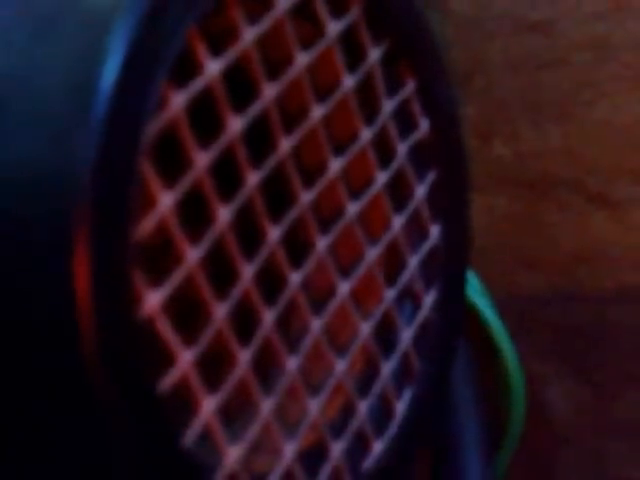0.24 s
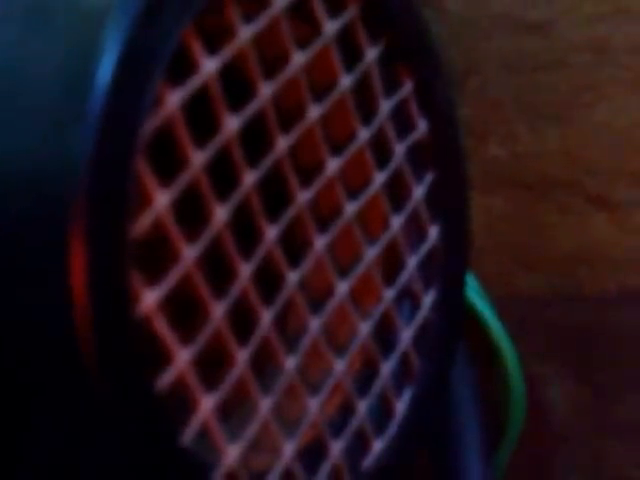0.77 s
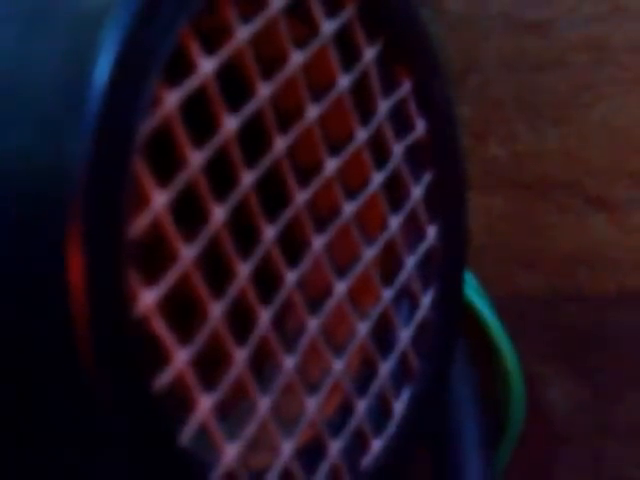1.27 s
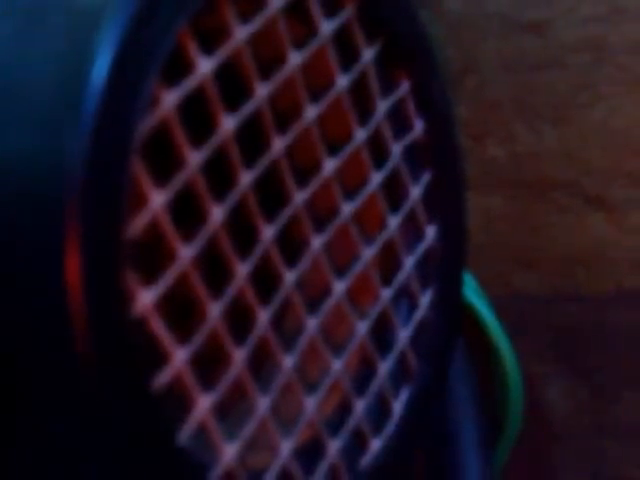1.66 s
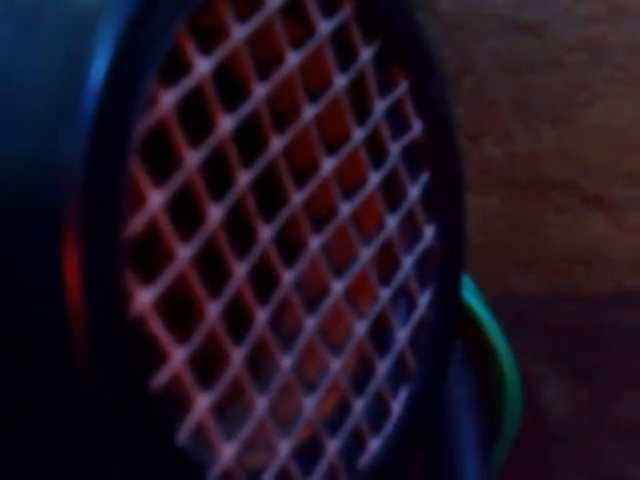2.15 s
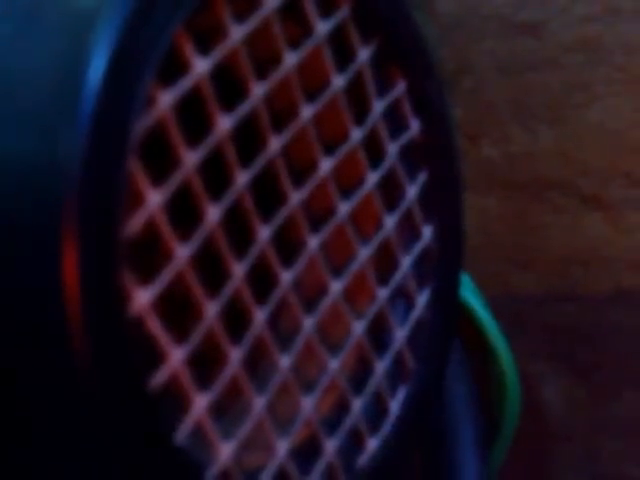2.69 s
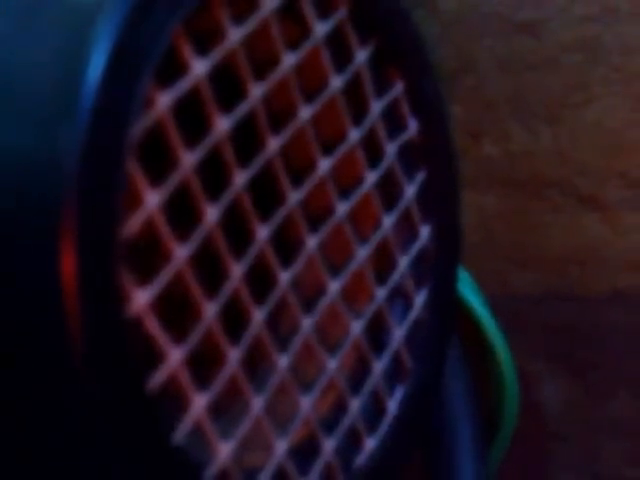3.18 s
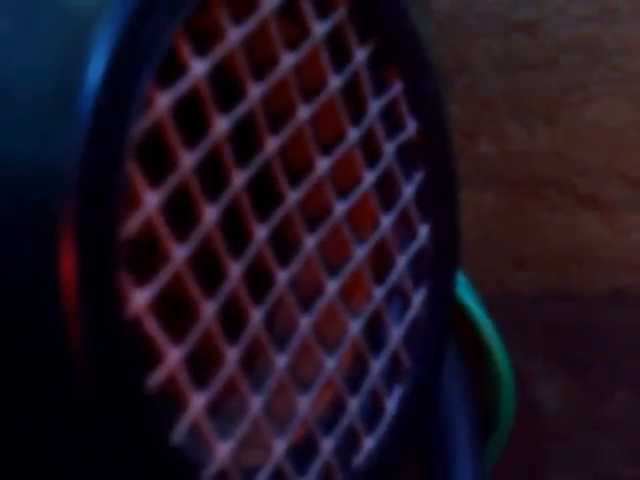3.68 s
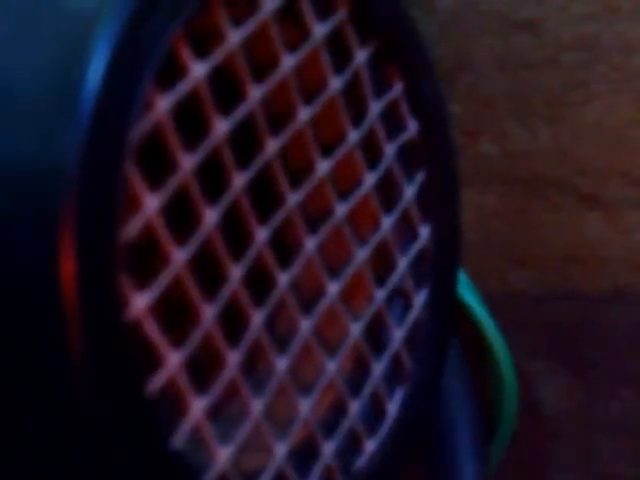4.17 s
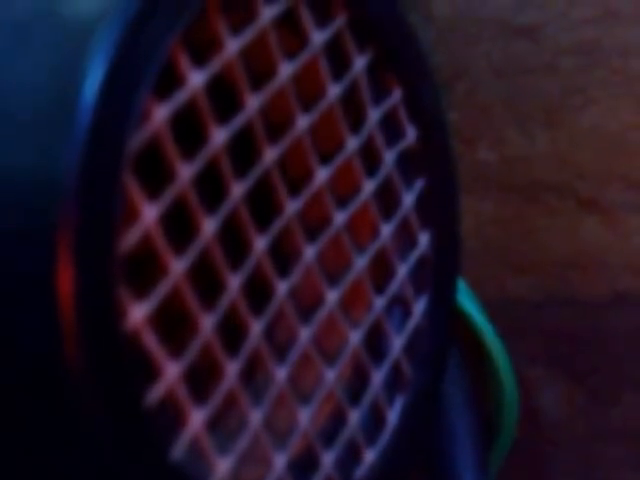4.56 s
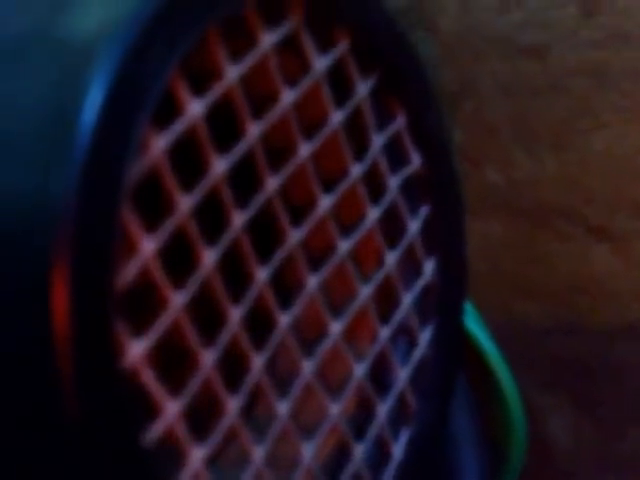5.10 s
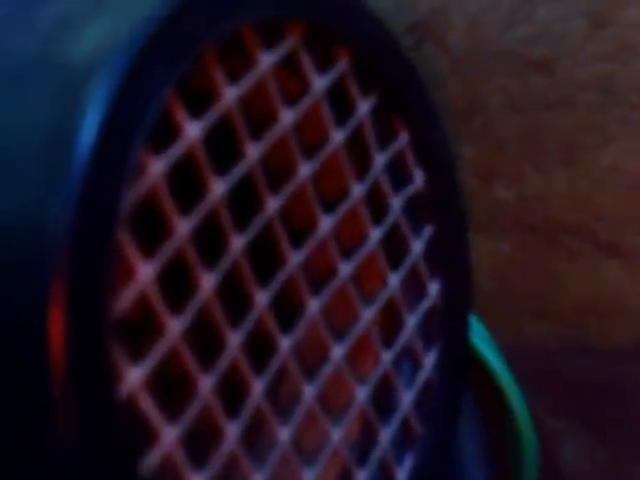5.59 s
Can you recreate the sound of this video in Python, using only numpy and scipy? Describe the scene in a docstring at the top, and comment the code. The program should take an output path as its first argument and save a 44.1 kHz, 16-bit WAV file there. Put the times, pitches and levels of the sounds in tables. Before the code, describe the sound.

A small heater blower runs steadily close by, its airy hiss carrying a scratchy chirping loop about ten times a second.

```python
"""A small diesel heater idles close by; its blower makes about ten turns a second.
Motor brushes scrape over the same worn patches and nicks on every turn and ring the housing, as filtered
looping noise with gliding squeaks, so the hiss chirps in a loop; now and then the rotor sags.
Air, as shaped noise, rushes through the outlet grille; the motor hum and drive whine are sine tones.
Two low sine drones and a few soft decaying bumps lie underneath."""
import sys
import numpy as np
from scipy import signal
from scipy.fft import rfft, irfft
from scipy.io import wavfile
from scipy.ndimage import uniform_filter1d

SR = 44100
rng = np.random.default_rng(int(sys.argv[2]) if len(sys.argv) > 2 else 0)


def wrap_up_sound(samples):
    """Save the sound to the file named by the first command line argument, as 16-bit audio."""
    columns = np.atleast_2d(samples).T
    # keep every value between -1 and 1, then stretch to whole-number steps
    tamed = np.clip(columns, -1, 1)
    steps = np.round(tamed * 32767).astype(np.int16)
    wavfile.write(sys.argv[1], SR, steps)


N = 257544

FREE_TURNS_PER_S, SAG_TURNS_PER_S = 10.1836, 0.41   # free speed; drop in a full sag


def from_db(db):
    """Decibels to gain."""
    return 10 ** (np.asarray(db) / 20)


def rms_one(x):
    """Scale to unit rms."""
    return x / np.sqrt(np.mean(x ** 2) + 1e-20)


def evened(x, window_s=0.393):
    """Hold the rms at 1 over a few turns."""
    power = np.abs(uniform_filter1d(x ** 2, int(window_s * SR)))
    return x / np.sqrt(power + 1e-12)


def in_time(rows):
    """One value per sample for each column of a curve."""
    s, *columns = np.transpose(rows)
    return [np.interp(np.arange(N) / SR, s, c) for c in columns]


def bell(away, half_length):
    """A smooth rise and fall of height 1."""
    return np.exp(-.5 * np.minimum((away / half_length) ** 2, 40))


def step(s, length_s):
    """A smooth change from 0 to 1 around time s."""
    return .5 + .5 * np.tanh((np.arange(N) / SR - s) / length_s)


def drift(rate_hz):
    """Smooth chance of rms 1: noise low-passed at rate_hz, made at SR / 40."""
    lowpass = signal.butter(2, rate_hz, fs=SR / 40, output="sos")
    slow = signal.sosfilt(lowpass, rng.standard_normal(N // 40 + 2002))[2000:]   # drop the filter's start
    return np.interp(np.arange(N) / 40, np.arange(len(slow)), rms_one(slow))


def resonate(x, hz, width_hz):
    """Ring a cluster of close modes as one band-pass; rms 1."""
    edges_hz = np.clip([hz - width_hz / 2, hz + width_hz / 2], 10, .45 * SR)
    return rms_one(signal.sosfilt(signal.butter(2, edges_hz, "band", fs=SR, output="sos"), x))


def tone(cycles):
    """A sine of rms 1 that follows a cycle count from a random phase."""
    return np.sqrt(2) * np.sin(2 * np.pi * (cycles + rng.random()))


def drones(waver_db):
    """Two low tones: as the upper one swells, the deeper one sags in pitch and loses its octave."""
    # upper drone, pitch: t/s, f/Hz
    upper_pitch = [(0, 77.7), (2.4, 79.4), (4.1, 78.8), (5.84, 76.1)]
    # upper drone once swelled: t/s, level/dB
    swollen_level = [(2.7, -49), (2.89, -56), (3.59, -52.5), (4.47, -54.5), (5.38, -49), (5.8, -54.5)]
    # deeper drone: t/s, level before trim/dB
    deep_level = [(0.1, -61), (0.16, -54.5), (2.28, -58), (2.43, -69), (2.64, -52), (5.64, -59), (5.8, -55)]
    # octave of the deeper drone, before its fade: t/s, level/dB
    octave_level = [(0.0, -66), (0.51, -58), (0.85, -81), (1.16, -57.5), (2.57, -60), (2.6, -58)]
    unswollen_db, deep_trim_db = -61, -2
    deep_hz, sagged_hz = 62.9, 49.4

    (hz,), (swollen_db,) = in_time(upper_pitch), in_time(swollen_level)
    (deep_db,), (octave_db,) = in_time(deep_level), in_time(octave_level)
    swell, sagged = step(2.6, 0.14), step(2.69, 0.21)
    upper_db = (1 - swell) * unswollen_db + swell * swollen_db
    upper = from_db(upper_db) * tone(np.cumsum(hz) / SR)
    deep_cycles = np.cumsum(deep_hz + (sagged_hz - deep_hz) * sagged) / SR
    deep = from_db(deep_db + deep_trim_db + waver_db * drift(6.6)) * tone(deep_cycles)
    octave = from_db(octave_db + waver_db * drift(6.3)) * tone(2 * deep_cycles)
    return upper + deep + (1 - sagged) * octave


def bumps(decay_s):
    """A soft push swells and dies within a cycle or two."""
    # soft bumps of handling: t/s, envelope peak/dB, f/Hz
    pushes = [(1.163, -43.5, 48), (3.644, -40.5, 70)]
    out = np.zeros(N)
    for s, peak_db, hz in pushes:
        age_s = np.maximum(np.arange(N) / SR - s, 0)
        envelope = age_s / decay_s * np.exp(1 - age_s / decay_s)
        out += from_db(peak_db) * envelope * np.sin(2 * np.pi * hz * age_s)
    return out


def flow():
    """Gains of eddies and duct in dB: both ease off slowly and shift briefly with each surge."""
    # brief surges of the air flow: t/s, eddies rise/dB, duct rise/dB
    surges = [(0.8, -0.1, 2.5), (1.15, 0.2, 2), (2.38, 1.5, 3), (3.25, 0.7, -1), (4.6, 1.6, -1)]
    surge_half_s = 0.12
    t = np.arange(N) / SR
    eddies_db = -62.5 - 0.26 * t   # easing in dB per s
    duct_db = -65 - 0.5 * t
    for s, eddies_rise_db, duct_rise_db in surges:
        surge = bell(t - s, surge_half_s)
        eddies_db += eddies_rise_db * surge
        duct_db += duct_rise_db * surge
    return eddies_db, duct_db


def air(gust_db, flutter_db):
    """Turbulence at the grille: a dull rush, the hollow note of the duct and a thin fluttering hiss."""
    # spectrum of the rush, relative: f/Hz, density/dB
    rush_spectrum = [(20, -0.5), (33, -1.5), (55, 5.5), (90, 1), (150, -4.5), (250, -2.5), (400, -9.5),
                     (650, -12.5), (1050, -16.5), (1700, -19), (3000, -22), (8000, -22), (12500, -25),
                     (15700, -23.5)]
    # resonances of the air duct: f/Hz, width/Hz, relative level/dB
    duct_modes = [(843.3, 89, 0), (1367, 132, -4)]
    rush_over_flow_db, eddies_top_hz = 8.5, 1200

    hz, density_db = np.transpose(rush_spectrum)
    bins_hz = np.maximum(np.arange(N // 2 + 1) * SR / N, 1)
    shape = from_db(np.interp(np.log(bins_hz), np.log(hz), density_db))
    shaped = irfft(rfft(rng.standard_normal(N)) * shape, N)
    rush = from_db(rush_over_flow_db) * rms_one(shaped)
    eddies = signal.sosfiltfilt(signal.butter(2, eddies_top_hz, fs=SR, output="sos"), rush)
    hiss = rush - eddies
    duct = sum(from_db(db) * resonate(rng.standard_normal(N), centre_hz, width_hz)
               for centre_hz, width_hz, db in duct_modes)
    eddies_db, duct_db = flow()
    # only the duct and the large, low eddies follow gusts and surges
    gusty = from_db(gust_db * drift(44)) * (from_db(eddies_db) * eddies + from_db(duct_db) * duct)
    return gusty + from_db(eddies_db.mean() + flutter_db * drift(50)) * hiss


def rotor_angle():
    """Turns made so far: the rotor runs free, eases into each sag and recovers exponentially."""
    # sags, about every three seconds: t of lowest speed/s, share of the full sag
    sags = [(0.341, 0.92), (3.11, 1), (6.08, 1)]
    onset_s, recovery_s = 0.278, 0.436
    turns_per_s = np.full(N, FREE_TURNS_PER_S)
    for s, share in sags:
        age_s = np.arange(N) / SR - s
        fade = np.where(age_s < 0, .5 * (age_s / onset_s) ** 2, age_s / recovery_s)
        turns_per_s -= share * SAG_TURNS_PER_S * np.exp(-fade)
    return np.cumsum(turns_per_s) / SR


def turns_past(angle, where):
    """Signed distance from a place on the rotor, within half a turn."""
    return (angle - where + .5) % 1 - .5


def motor(angle):
    """Hum locked to the rotor and softer in each sag, and the thin whine of its drive."""
    # hum: multiple of the rotor speed, level at the mean speed/dB
    hum_orders = [(14, -72), (17, -71), (20, -74), (21, -60), (28, -71), (35, -74.5)]
    # switching whine of the drive and its sidebands: f/Hz, level/dB
    whine_lines = [(15518, -91), (15589, -89), (15659, -83), (15729, -83)]
    hum_db_per_sag = 4.5
    sag = (FREE_TURNS_PER_S - np.gradient(angle) * SR) / SAG_TURNS_PER_S
    hum = sum(from_db(level_db) * tone(round(order) * angle) for order, level_db in hum_orders)
    whine = sum(from_db(level_db) * tone(hz * np.arange(N) / SR + drift(3.2) / 2)
                for hz, level_db in whine_lines)
    return from_db(-hum_db_per_sag * (sag - sag.mean())) * hum + whine


def friction(angle, repeat, wander_hz, size=4096):
    """A brush reads one ring of roughness every turn, shifting between two tracks; the rest is fresh noise."""
    points = size * 10   # per turn, interpolated
    tracks = signal.resample(rng.standard_normal((2, size)), points, axis=1)
    inner, outer = tracks[:, (angle % 1 * points).astype(int) % points]
    seat_rad = drift(wander_hz) / 2
    ring = np.cos(seat_rad) * inner + np.sin(seat_rad) * outer
    return np.sqrt(repeat) * ring + np.sqrt(1 - repeat) * rng.standard_normal(N)


def housing(angle, swing_db):
    """The steady rub rings the housing, harder twice a turn as the rotor is slightly out of round."""
    # housing resonances: f/Hz, width/Hz, level at the mean load/dB
    modes = [(1960, 39, -80.5), (2523, 36.5, -73), (2589, 55, -76.5), (2480, 570, -69), (3284, 28, -69.5),
             (3484, 140, -73.5), (3774, 63, -71), (4476, 570, -61.5), (4680, 26, -70.5), (5130, 130, -65.5),
             (5610, 270, -66), (5690, 140, -69.5), (5920, 260, -66.5), (6690, 110, -80), (7860, 560, -74.5),
             (10900, 1350, -72)]
    pressure = from_db(-swing_db * np.cos(4 * np.pi * angle))
    rubs = [pressure * friction(angle, repeat=0.84, wander_hz=0.71) for _ in range(2)]
    return sum(from_db(level_db) * resonate(rubs[k % 2], hz, width_hz)
               for k, (hz, width_hz, level_db) in enumerate(modes))


def brush_scrapes(angle, pressure_db):
    """Each worn patch swells the friction as it passes under the brush; all ring the same modes."""
    # patches: angle/turns, half length/turns, relative level/dB, favoured f/Hz, fall away from it/(dB/octave)
    patches = [(0.215, 0.063, 3, 9740, 6), (0.3, 0.045, 3, 1900, 13), (0.55, 0.08, -1.5, 3530, 20),
               (0.68, 0.05, -3.5, 5760, 18), (0.8, 0.076, 0.86, 3760, 7), (0.95, 0.034, -2.5, 825, 9)]
    # what a scrape rings with: f/Hz, width/Hz, level before the patch levels/dB
    modes = [(794, 106, -59), (1965, 57, -70.5), (2660, 630, -67.5), (3305, 100, -66.5), (3500, 550, -62),
             (4510, 560, -58), (5800, 720, -58), (7700, 1050, -65.5), (11040, 1800, -69)]
    grit = [friction(angle, repeat=0.9, wander_hz=0.96) * from_db(pressure_db * drift(13.0))
            for _ in range(3)]
    passes = [(bell(turns_past(angle, where), half_turns), *colour)
              for where, half_turns, *colour in patches]
    out = np.zeros(N)
    for k, (hz, width_hz, level_db) in enumerate(modes):
        touch = sum(shape * from_db(db - fall_db * abs(np.log2(hz / favoured_hz)))
                    for shape, db, favoured_hz, fall_db in passes)
        ring = evened(resonate(touch * grit[k % len(grit)], hz, width_hz))
        out += from_db(level_db) * np.sqrt(np.mean(touch ** 2)) * ring
    return out


def brush_chirps(angle, uneven_db, count):
    """Each nick gives a short gliding squeak, a little different every turn; faint nicks lie at random."""
    # nicks: angle/turns, half length/s, f at centre/Hz, glide/(Hz/ms), mean level at centre and mean load/dB
    nicks = [(0.09, 0.0012, 8040, -6, -64.5), (0.19, 0.0012, 5480, -100, -54.5),
             (0.235, 0.0015, 4525, -62, -54.5), (0.28, 0.0033, 4640, -12, -61),
             (0.42, 0.0013, 7900, 0, -64), (0.6, 0.00076, 3550, 158, -54.5),
             (0.604, 0.0023, 5300, 489, -59), (0.752, 0.0015, 4810, -3, -54),
             (0.803, 0.0013, 4680, 50, -53.5), (0.875, 0.0013, 4790, 100, -56),
             (0.994, 0.0017, 4430, 0, -53.5)]
    faint_half_s, faint_db = 0.0023, -66
    faint_low_hz, faint_high_hz, faint_max_glide_hz_per_ms = 4160, 6630, 201
    slip_cycles = 0.2   # phase stray of a squeak, rms
    faint = [(where, faint_half_s, faint_low_hz * (faint_high_hz / faint_low_hz) ** pitch,
              faint_max_glide_hz_per_ms * (2 * glide - 1), faint_db)
             for where, pitch, glide in rng.random((count, 3))]
    out = np.zeros(N)
    for where, half_s, hz, glide_hz_per_ms, level_db in [*nicks, *faint]:
        age_s = turns_past(angle, where) / FREE_TURNS_PER_S
        cycles = hz * age_s + .5 * glide_hz_per_ms * 1000 * age_s ** 2
        gain = from_db(level_db + uneven_db * drift(5))
        out += gain * bell(age_s, half_s) * tone(cycles + slip_cycles * drift(4.4))
    return out


def scene():
    """Sum all sources; both channels are alike."""
    # how hard the brushes bear, only its swing about the mean counts: t/s, load/dB
    brush_load = [(0.0, -56), (1.76, -53.5), (2.77, -54.5), (5.69, -54.5), (5.75, -55.5)]
    spots_follow, rub_follows = 1.6, 0.7   # share of the load's swing
    spots_ease_db_per_s = 0.01
    angle = rotor_angle()
    load_db, = in_time(brush_load)
    load_db = load_db - load_db.mean()
    spots_db = spots_follow * load_db - spots_ease_db_per_s * np.arange(N) / SR

    low = drones(waver_db=1.5) + bumps(decay_s=0.0062)
    rush = air(gust_db=1.0, flutter_db=1.44)
    rub = from_db(rub_follows * load_db) * housing(angle, swing_db=0.7)
    spots = brush_scrapes(angle, pressure_db=0.95) + brush_chirps(angle, uneven_db=1.0, count=8)
    heater = rush + motor(angle) + rub + from_db(spots_db) * spots
    return np.tile(low + heater, (2, 1))


def record(dry):
    """Steep elliptic low-pass: the top is cut above 15.8 kHz."""
    return signal.sosfilt(signal.ellip(12, .1, 80, 15800, fs=SR, output="sos"), dry)


dry = scene()
out = record(dry)
wrap_up_sound(out)
```